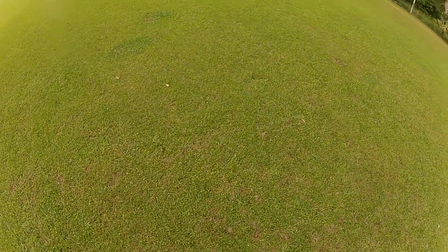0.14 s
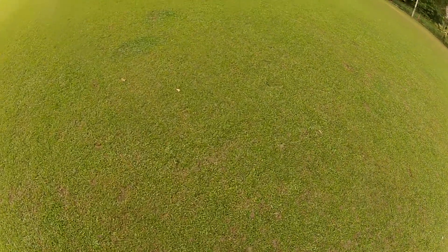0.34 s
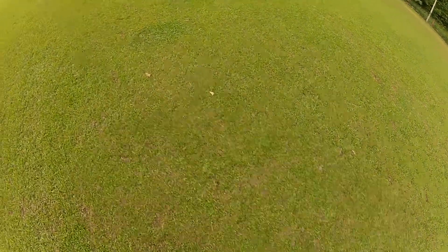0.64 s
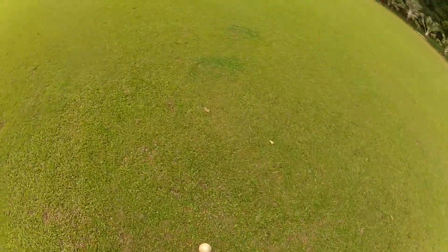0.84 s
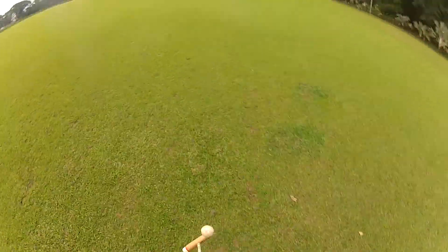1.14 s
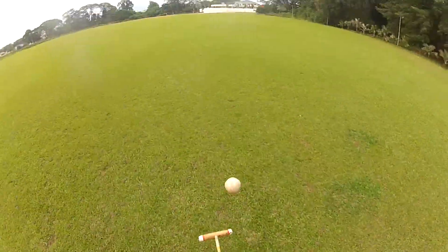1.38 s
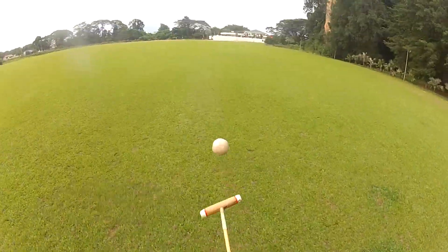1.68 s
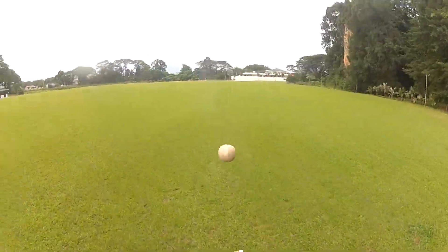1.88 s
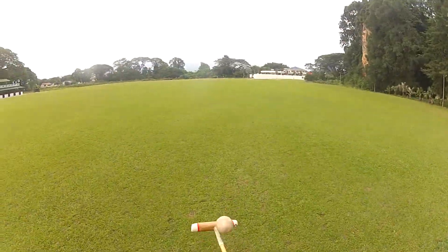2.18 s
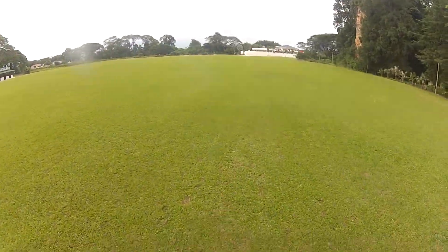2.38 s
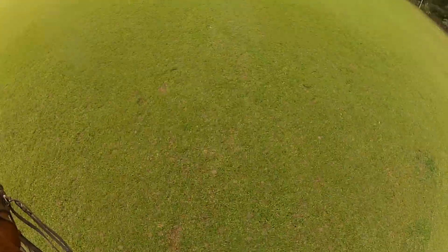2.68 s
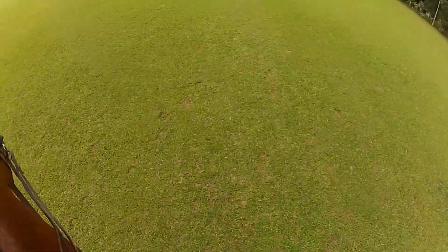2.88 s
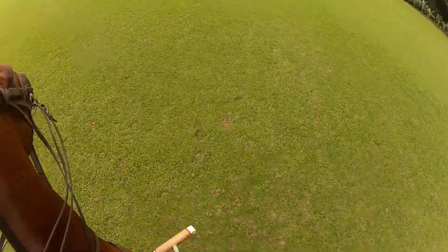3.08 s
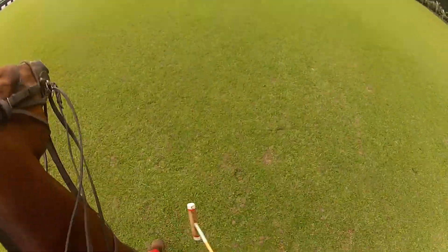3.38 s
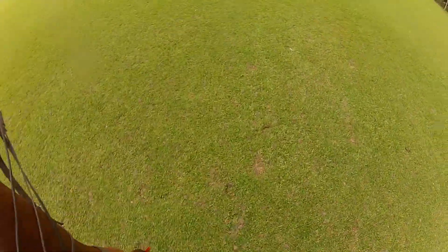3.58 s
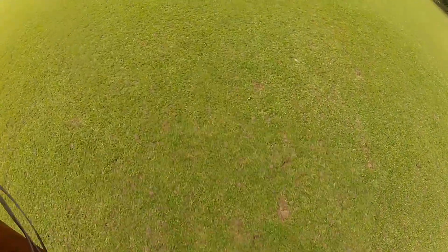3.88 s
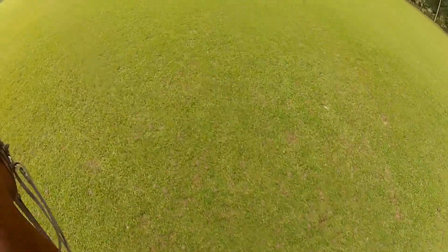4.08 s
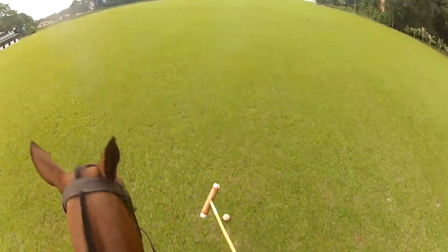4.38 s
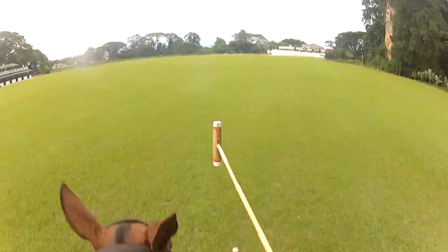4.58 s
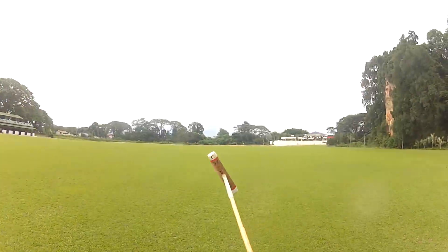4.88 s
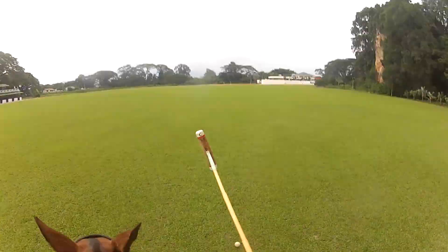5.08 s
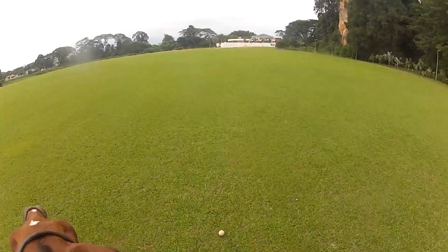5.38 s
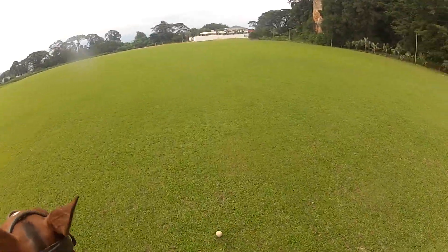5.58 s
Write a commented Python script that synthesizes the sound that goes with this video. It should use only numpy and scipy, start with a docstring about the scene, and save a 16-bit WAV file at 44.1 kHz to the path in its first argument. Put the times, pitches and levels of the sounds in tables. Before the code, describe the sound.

Loud, very short mallet-on-ball clacks come at irregular half-second spacing, each with a hollow knock and almost no tail. Between them, muffled thuds, small dry ticks and rubbing cloth and leather suggest a moving horse. A faint distant low drone stops early. After four seconds there is a glancing grass scrape and brief leather groan, then rising wind. Close, outdoor, narrow-band camera sound.

```python
"""Mallet on ball: a polo rider taps along a grass field, close to a microphone in a camera worn on the body.
Each tap is a short pressure swing, with damped modes for wood and knock and a dull shove into the turf.
Hooves and tack thud as damped modes with noise ticks; cloth and leather rub as filtered noise and grains.
A wavering tone drones far off at first, and one gliding tone groans from the saddle.
Wind is low noise on the microphone, shaped by gusts and swelling as the horse speeds up at the end."""
import sys
import numpy as np
from scipy import signal
from scipy.fft import rfft, irfft, next_fast_len
from scipy.io import wavfile
from scipy.ndimage import uniform_filter1d, map_coordinates

SR = 44100
rng = np.random.default_rng(int(sys.argv[2]) if len(sys.argv) > 2 else 0)


def to_wav(s):
    """Save 16-bit WAV."""
    ch = np.atleast_2d(s).T  # columns
    pcm = np.round(np.clip(ch, -1, 1) * 32767)  # PCM
    wavfile.write(sys.argv[1], SR, pcm.astype(np.int16))


N = 253134

# Mallet on ball, tap by tap; crack, knock, wood and ping levels are ahead of the contact filter:
# (time [s], crack level [dB], crack pitch [Hz], knock level [dB], knock pitch [Hz], knock t60 [s],
#  wood level [dB], ping level [dB], echo delay [s], echo level relative to crack [dB])
TAPS = [(0.8551, -5, 1640, -14, 516, 0.031, -16, -33, 0.001824, -3),
        (1.1698, 1, 1680, -17, 550, 0.014, -3.5, -42, 0.0019, -7),
        (1.6096, -3, 1520, -12, 635, 0.024, -15, -24, .0053, -14.5),
        (2.2099, -5.5, 1270, -5, 592, 0.023, -22.5, -14.5, 0.0036, -25),
        (2.6999, -4, 1280, 2, 530, 0.014, -21.5, -14.5, 0.0051, -13),
        (3.0830, 3, 2040, -3, 524, 0.028, -13, -22.5, 0.001127, -7.5),
        (4.0523, -21.5, 1460, -13.5, 505, 0.041, -16.5, -24, 0.00103, 0),
        (5.3190, -27, 1120, -19.5, 620, 0.019, -54, -62, 0.0021, -18)]
# Lurches of horse and rider that rub cloth and leather:
# (start [s], length [s], boom level [dB], rustle level [dB])
LURCHES = [(0.0, 0.097, -41.5, -56.5), (0.309, 0.15, -43.5, -63), (0.524, 0.17, -44, -56.5),
           (0.803, 0.081, -40, -54), (0.946, 0.15, -43.5, -54), (1.285, 0.11, -40, -56),
           (1.424, 0.087, -43.5, -58), (1.827, 0.071, -44, -62), (2.122, 0.044, -47.5, -59),
           (2.41, 0.2, -45.5, -53.5), (2.706, 0.056, -40, -55.5), (2.87, 0.14, -43, -56),
           (3.105, 0.25, -45.5, -56), (3.39, 0.077, -41, -55), (3.6, 0.11, -45.5, -59.5),
           (3.808, 0.078, -43, -57), (3.968, 0.35, -45, -55.5), (4.464, 0.23, -43, -56),
           (4.87, 0.18, -45.5, -57), (5.175, 0.053, -40, -53), (5.667, 0.097, -34.5, -55.5)]
# Colour of dry rustles and ticks: (frequency [Hz], relative level per Hz [dB])
RUSTLE_SPECTRUM = [(300, -42), (900, 4.5), (1400, -4), (2100, 0.5), (2800, 0), (3600, -3), (4400, -8),
                   (5100, -6.5), (7000, -12)]


def amp(db):
    """Decibels to gain."""
    return 10 ** (np.asarray(db) / 20)


def unit(x):
    """Scale to rms 1."""
    return x / np.sqrt(np.mean(x ** 2) + 1e-20)


def power_sum(*levels_db):
    """Level of unrelated sounds heard together, in dB."""
    return 10 * np.log10(sum(amp(db) ** 2 for db in levels_db))


def colour(x, points):
    """Filter by (Hz, dB) points joined on a log frequency axis."""
    m = next_fast_len(len(x) + 8192)
    hz, db = np.transpose(points)
    bins_hz = np.fft.rfftfreq(m, 1 / SR)
    gain = amp(np.interp(np.log(bins_hz + 1), np.log(hz), db))
    return irfft(rfft(x, m) * gain, m)[:len(x)]


def wobble(rate):
    """A smooth random curve through normally distributed knots, rate knots a second."""
    knots = rng.standard_normal(int(N * rate / SR) + 4)
    return map_coordinates(knots, [np.arange(N) * rate / SR])


def patchy(x, depth_db):
    """Let the colour of a noise drift in patches of time and frequency."""
    z = signal.stft(x, nperseg=512)[2]
    field = uniform_filter1d(rng.standard_normal(z.shape), size=8, axis=0)
    field = uniform_filter1d(field, size=9, axis=1)
    return signal.istft(z * amp(depth_db * unit(field)), nperseg=512)[1][:N]


def ring(t, hz, t60, attack):
    """A damped mode that starts at t = 0; t60 and attack constant in seconds."""
    t = np.maximum(t, 0)
    decay = np.exp(-np.log(1000) * t / t60)
    return np.sin(2 * np.pi * hz * t) * decay * (1 - np.exp(-t / attack))


def add(track, s, sound):
    """Mix a sound into the track at time s."""
    part = track[round(s * SR):][:len(sound)]
    part += sound[:len(part)]


def wind_level():
    """Short gusts ride on the airflow and last longer at speed; dB, one value a sample."""
    # steady airflow over the microphone, ahead of the buffet gain: (time [s], level [dB])
    airflow = [(0.0, -50.5), (0.88, -49), (0.99, -44), (1.57, -47.5), (1.68, -42), (1.98, -39),
               (2.17, -38.5), (2.45, -48.5), (2.78, -46.5), (3.28, -43), (3.47, -51.5), (3.66, -49.5),
               (4.04, -42.5), (4.32, -45.5), (4.51, -41.5), (4.81, -39.5), (5.07, -31.5), (5.74, -26.5)]
    # single gusts as the rider leans and swings: (time [s], peak level [dB])
    gust_peaks = [(0.845, -35), (1.515, -33), (2.02, -42), (2.25, -37.5), (2.80, -36.5), (3.44, -38.5),
                  (4.96, -29), (5.58, -25)]
    buffet_db = 2  # turbulence over the steady airflow
    median_width_s = 0.041  # from a gust's peak to 5 dB below it, at the median airflow
    stretch_db = 25  # this much more airflow makes a gust e times as long
    now = np.arange(N) / SR
    flow_db = np.interp(now, *np.transpose(airflow))
    width = median_width_s * np.exp((flow_db - np.median(flow_db)) / stretch_db)
    gusts_db = [peak_db - 5 * ((now - s) / width) ** 2 for s, peak_db in gust_peaks]
    return power_sum(flow_db + buffet_db, *gusts_db)


def wind(wind_db):
    """Turbulence on the microphone: faster air makes smaller eddies and a higher rumble."""
    # rumble in slow air: (frequency [Hz], relative level per Hz [dB])
    slow_spectrum = [(10, -24), (25, -8), (45, 1), (80, 2), (160, -1), (260, -6), (400, -21.5),
                     (700, -35.5), (1500, -49)]
    # rumble in fast air: (frequency [Hz], relative level per Hz [dB])
    fast_spectrum = [(10, -38), (25, -15), (45, -7), (80, -1), (170, -0.5), (260, -1), (350, -4.5),
                     (480, -12.5), (700, -24), (1500, -60.5)]
    speed = np.clip((wind_db + 39.5) / 14, 0, 1)  # 0 slow, 1 fast
    lumps = amp(1.03 * wobble(25) + 1.3 * wobble(90))
    slow = unit(colour(rng.standard_normal(N) * lumps, slow_spectrum))
    fast = unit(colour(rng.standard_normal(N) * lumps, fast_spectrum))
    return amp(wind_db) * (np.sqrt(1 - speed) * slow + np.sqrt(speed) * fast)


def hum():
    """A faint, low, wavering drone far off that fades as the rider turns."""
    centre_hz, mean_db = 91.7, -46
    end_s, fade_s = 1.37, 0.079
    t = np.arange(N) / SR
    phase = 2 * np.pi * centre_hz * t + 0.29 * wobble(10)
    level = amp(mean_db + 1.5 * wobble(7.5))
    return level * np.sin(phase) * np.clip((end_s - t) / fade_s, 0, 1)


def rub_levels(wind_db):
    """Each lurch swells, holds and dies away, and strong wind shakes the housing too; boom and rustle dB."""
    rise_s, fall_s = 0.026, 0.048  # time per 10 dB
    resting_boom_db, resting_rustle_db = -54, -59.5  # between lurches
    # housing boom at the reference wind level, and its growth in dB per dB of wind
    shake_db, reference_wind_db, shake_growth = -39.5, -25, 1.18
    now = np.arange(N) / SR
    booms = [resting_boom_db, shake_db + shake_growth * (wind_db - reference_wind_db)]
    rustles = [resting_rustle_db]
    for s, length, boom_db, rustle_db in LURCHES:
        before = np.maximum(s - now, 0)
        after = np.maximum(now - s - length, 0)
        fade_db = -10 * (before / rise_s + after / fall_s)
        booms.append(boom_db + fade_db)
        rustles.append(rustle_db + fade_db)
    return power_sum(*booms), power_sum(*rustles)


def rubbing(boom_db, rustle_db):
    """Cloth and leather rub in tiny slips that both crackle and boom in the camera housing."""
    # boom of the housing: (frequency [Hz], relative level per Hz [dB])
    boom_spectrum = [(100, -38), (220, -8.5), (320, 0.5), (480, -2), (640, -2), (780, -11.5), (1000, -26),
                     (1400, -29), (3000, -63.5)]
    slips = wobble(130)
    clumps = amp(1.82 * wobble(45))  # slips come in small bunches
    grains = (rng.random(N) < 170 / SR) * rng.standard_normal(N) * clumps  # about 170 a second
    smooth_boom = unit(colour(rng.standard_normal(N) * amp(2.4 * slips), boom_spectrum))
    boom = smooth_boom + 0.64 * unit(colour(grains, boom_spectrum))
    roughness = clumps * amp(2 * slips + 1.8 * wobble(600))
    rustle = unit(colour(rng.standard_normal(N) * roughness, RUSTLE_SPECTRUM))
    # each slip starts abruptly and dies within milliseconds, with noise of its own
    bursts = signal.lfilter([1], [1, -np.exp(-1 / (0.00051 * SR))], np.abs(grains))
    crackle = unit(colour(bursts * rng.standard_normal(N), RUSTLE_SPECTRUM))
    friction = unit(patchy(rustle + 0.92 * crackle, depth_db=2))
    return amp(boom_db) * unit(boom) + amp(rustle_db) * friction


def jostles():
    """Light knocks of loose tack at random in the lurches: (time, thud dB, thud Hz, tick dB) rows."""
    knocks_per_s, tries = 4, 4
    thud_db, thud_hz, tick_db = -36, 505, -46  # centres of the random spread
    spread_db, spread_octaves = 2.5, 0.305
    rows = []
    for s, length, *_ in LURCHES:
        for _ in range(tries):
            chance, when = rng.random(2)
            thud, pitch, tick = rng.standard_normal(3)
            if chance < knocks_per_s * length / tries:
                rows.append((s + when * length, thud_db + spread_db * thud,
                             thud_hz * 2 ** (spread_octaves * pitch), tick_db + spread_db * tick))
    return rows


def hooves_and_tack():
    """Dull, quickly damped thuds, each with a small dry tick."""
    # single thuds and dry ticks of hooves and tack, tick level ahead of its colouring and gain:
    # (time [s], thud peak level [dB], thud pitch [Hz], tick level [dB])
    thuds_and_ticks = [(0.418, -26.5, 277, -45), (0.468, -27.5, 530, -38), (0.487, -24.5, 555, -38),
                       (0.587, -25, 334, -42), (0.715, -33.5, 590, -46), (0.736, -30, 640, -40.5),
                       (0.955, -29.5, 486, -52), (1.543, -26, 303, -38.5), (1.569, -25, 432, -38),
                       (1.593, -26, 530, -38), (1.683, -25, 438, -38.5), (1.706, -29, 320, -41),
                       (1.876, -28, 420, -36), (1.930, -26, 423, -38.5), (2.504, -25.5, 358, -47),
                       (2.916, -34.5, 540, -42.5), (2.981, -38, 510, -30), (3.159, -23.5, 595, -47.5),
                       (3.278, -32.5, 670, -34.5), (3.704, -21.5, 239, -38), (3.988, -28.5, 537, -37),
                       (4.033, -26.5, 536, -32), (4.097, -29, 538, -36.5), (4.115, -29, 584, -45),
                       (4.138, -25, 586, -35.5), (4.229, -25.5, 580, -35), (4.268, -32, 517, -41),
                       (4.298, -33, 398, -35), (4.445, -29.5, 400, -41.5)]
    thuds, ticks = np.zeros(N), np.zeros(N)
    t = np.arange(SR // 12) / SR
    for s, thud_db, thud_hz, tick_db in thuds_and_ticks + jostles():
        body = ring(t, thud_hz, 0.025, attack=0.00094)
        body = body + 0.33 * ring(t, 540, 0.037, attack=0.0021)
        add(thuds, s, amp(thud_db) * body / np.abs(body).max())
        tick = rng.standard_normal(len(t)) * amp(-60 * t / 0.021)
        add(ticks, s, amp(tick_db) * tick)
    return thuds + amp(3.0) * colour(ticks, RUSTLE_SPECTRUM)


def mallet():
    """Each contact shoves the ball (one swing of pressure), then wood and a hollow knock ring out."""
    # modes of mallet head and ball: (frequency [Hz], level ahead of wood level and filter [dB], t60 [s])
    wood_modes = [(830, 5, 0.0026), (1130, -6.5, 0.0033), (1645, -2.5, 0.0073), (1920, -22.5, 0.015),
                  (3450, -3.5, 0.0062)]
    # the contact lasts about half a millisecond, so its force has a dip above the wood's main modes:
    # (frequency [Hz], gain [dB])
    contact_filter = [(100, -14), (400, 0), (1100, -2.5), (2230, 0), (2580, -7.5), (3000, 0), (3600, -4),
                      (5000, 1.5)]
    ping_hz, ping_t60 = 3030, 0.018  # the longest-lived mode of the wood, t60 in s
    # phase wander [rad] and its rate [knots/s], so that the wood does not ring like glass
    waver_rad, waver_rate = 0.52, 450
    out = np.zeros(N)
    lead = SR // 200  # samples ahead of contact
    t = np.arange(-lead, SR // 10) / SR
    for s, crack_db, crack_hz, knock_db, knock_hz, knock_t60, wood_db, ping_db, delay, echo_db in TAPS:
        cycles = crack_hz * t
        crack = 1.397 * np.sin(2 * np.pi * cycles) * np.exp(-(cycles / 0.52) ** 2)
        knock = ring(t - 0.0011, knock_hz, knock_t60, attack=0.00054)
        wood = sum(amp(db) * ring(t - 0.0003, hz, t60, attack=0.00035) for hz, db, t60 in wood_modes)
        waver_s = waver_rad * wobble(waver_rate)[:len(t)] / (2 * np.pi * ping_hz)
        ping = ring(t + 0.00037 + waver_s, ping_hz, ping_t60, attack=0.0001)
        # the turf or the horse's flank sends the crack back once; the rest is scattered
        echo = np.interp(t - delay, t, crack)
        scatter = rng.standard_normal(len(t)) * (t > 0.001) * amp(-60 * np.abs(t) / 0.033)
        scatter = signal.fftconvolve(scatter / np.linalg.norm(scatter), crack)[lead:][:len(t)]
        snap = rng.standard_normal(len(t)) * (t > -0.0003) * amp(-60 * np.abs(t) / 0.0085)
        blow = crack + amp(echo_db) * echo + amp(-17) * scatter + amp(-19) * snap
        tap = amp(crack_db) * blow + amp(knock_db) * knock
        tap = tap + amp(wood_db) * wood + amp(ping_db) * ping
        add(out, s + t[0], tap)
    return colour(out, contact_filter)


def turf():
    """Each tap presses ball and mallet into the turf; a glancing one drags through the grass."""
    # the mallet head scrapes the turf: (time [s], level ahead of colouring [dB])
    scrapes = [(4.0519, -9)]
    # colour of the scrape: (frequency [Hz], gain [dB])
    scrape_spectrum = [(300, -13), (700, 7), (2000, -4.5), (3000, 4.5), (4000, -30), (5500, -6)]
    push_hz, push_db = 264, -15.5  # the dull shove under every crack, dB relative to the crack setting
    out = np.zeros(N)
    t = np.arange(SR // 12) / SR
    for s, crack_db, *_ in TAPS:
        add(out, s, amp(crack_db + push_db) * ring(t, push_hz, 0.01, attack=0.00066))
    for s, db in scrapes:
        drag = rng.standard_normal(len(t)) * amp(-60 * t / 0.031) * (1 - np.exp(-t / 0.0012))
        add(out, s, amp(db) * colour(drag, scrape_spectrum))
    return out


def saddle():
    """Leather groans once, swelling and falling in pitch as its slips slow down."""
    start_s, length_s, rise_s, fall_s = 4.145, 0.047, 0.029, 0.0046
    start_hz, end_hz = 480, 301
    mean_db = -37  # of the fundamental's peak, at full swell
    age = np.arange(N) / SR - start_s
    hz = np.interp(age, [0, length_s], [start_hz, end_hz])
    swell = np.clip(np.minimum(age / rise_s, (length_s - age) / fall_s), 0, 1)
    phase = 2 * np.pi * np.cumsum(hz) / SR + 0.34 * wobble(200)
    level = amp(mean_db + 1.6 * wobble(200))
    return swell * level * (np.sin(phase) + 0.5 * np.sin(2 * phase))


def scene():
    """Open field: no reverberation beyond the taps' own short echo and scatter."""
    wind_db = wind_level()
    boom_db, rustle_db = rub_levels(wind_db)
    air = wind(wind_db) + hum()
    horse = rubbing(boom_db, rustle_db) + hooves_and_tack() + saddle()
    taps = mallet() + turf()
    return (air + horse + taps)[None]


def record(dry):
    """A narrow-band recorder whose stepped samples mirror sound into the treble, more the faster it changes."""
    # what the recorder lets through before it repeats the samples: (frequency [Hz], gain [dB])
    passband = [(10, 0.5), (4900, 0), (5350, -3), (5700, -15.5), (6000, -12), (6500, -55.5)]
    mirror_hz, top_hz = 12000, 15400  # carrier of the mirror image, and sharp upper cutoff
    sound = colour(dry[0], passband)
    slope = np.gradient(sound) * SR / (2 * np.pi * mirror_hz)
    carrier = np.cos(2 * np.pi * mirror_hz * np.arange(N) / SR)
    mirrored = amp(8.5) * slope * carrier
    mirrored = colour(mirrored, [(7000, 3.0), (10000, -0.5), (15000, -3.5)])
    spectrum = rfft(np.clip(sound + mirrored, -1, 1))
    return irfft(spectrum * (np.fft.rfftfreq(N, 1 / SR) < top_hz), N)[None]


dry = scene()
out = record(dry)
to_wav(out)
```